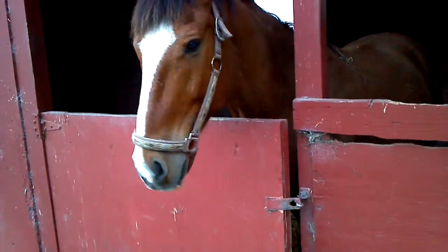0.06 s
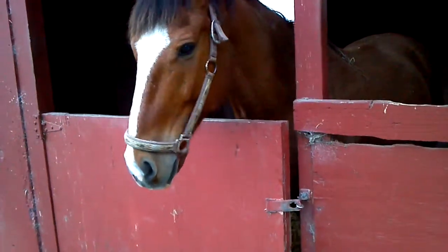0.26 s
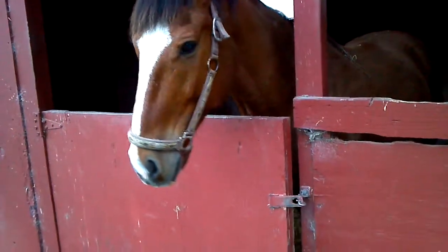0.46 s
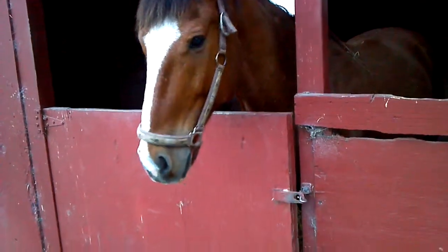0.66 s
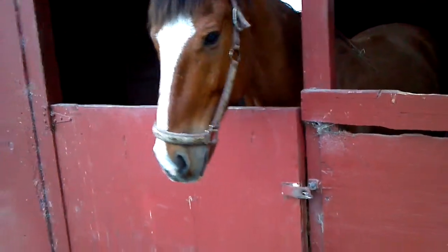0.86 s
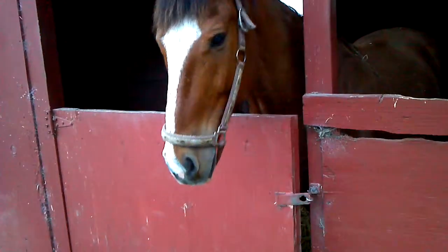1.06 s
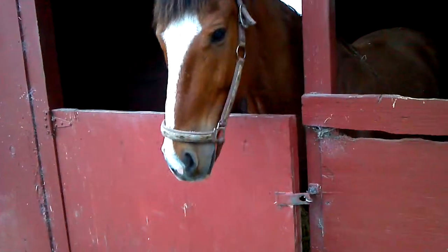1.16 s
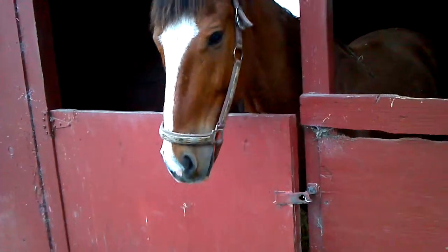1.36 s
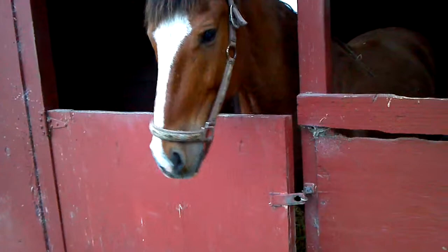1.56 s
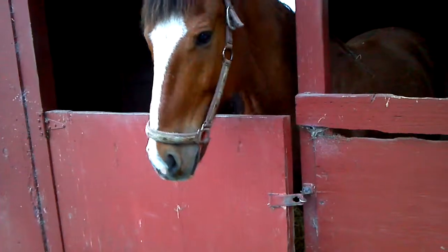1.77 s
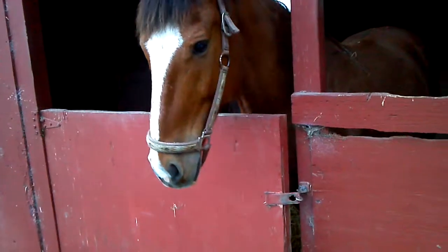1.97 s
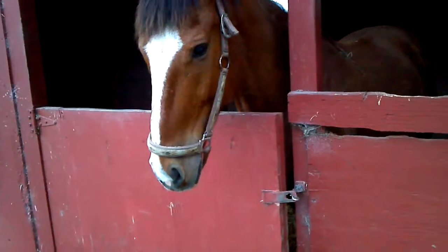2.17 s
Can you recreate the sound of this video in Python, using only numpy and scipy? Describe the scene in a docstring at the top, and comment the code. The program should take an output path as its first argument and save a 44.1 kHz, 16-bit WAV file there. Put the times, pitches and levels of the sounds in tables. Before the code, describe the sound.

A horse knocks a wooden stall door. Faint outdoor hiss opens; at 0.23 s one hard, boomy bang hits, slightly overloaded, with steel bolt rattle trailing to 0.45 s. A faint metal rub leads to a sharp clink at 1.04 s. Duller knocks come at 1.32, 1.5 and 1.62 s, with bolt clatter and sliding until 1.8 s, and a tiny tick at 2.15 s. Close microphone, short stall reverberation.

```python
"""Horse bumping a stall door

One hard bang on a wooden door, later three duller knocks: short pushes that ring the panel and the stall.
The door's steel bolt clatters and slides in its keeper: bursts of grainy noise that ring the metal.
A far-off outdoor hiss, made of coloured noise that gently rises and falls, lies underneath."""
import sys
import numpy as np
from scipy import signal
from scipy.fft import rfft, irfft
from scipy.io import wavfile

SR = 44100
rng = np.random.default_rng(int(sys.argv[2]) if len(sys.argv) > 2 else 0)


def master_out(mix):
    """Clip the mix to full scale and print it as 16-bit PCM to the path in sys.argv[1]."""
    frames = np.transpose(np.atleast_2d(mix))
    ceiling = np.clip(frames, -1, 1)
    pcm = np.round(ceiling * 32767).astype(np.int16)
    wavfile.write(sys.argv[1], SR, pcm)


N = 97020  # length in samples
T = np.arange(N) / SR  # time in seconds


def from_db(db):
    """Turn decibels into gain."""
    return 10 ** (np.asarray(db) / 20)


def at_hz(points, hz):
    """Read a table between its points, on a log-frequency axis."""
    point_hz, values = np.transpose(points)
    return np.interp(np.log(np.maximum(hz, 1)), np.log(point_hz), values)


def convolve(x, response):
    """Pass a sound through an impulse response."""
    return signal.fftconvolve(np.atleast_2d(x), np.atleast_2d(response), axes=-1)[:, :N]


def colour(x, points, share=1):
    """Filter a sound to a spectrum, with no sound ahead of its cause (minimum phase)."""
    size = 8192
    gain = from_db(share * at_hz(points, np.fft.rfftfreq(size, 1 / SR)))
    cepstrum = irfft(np.log(gain))
    # Folding the second half onto the first moves all the energy after time zero.
    cepstrum[1:size // 2] *= 2
    cepstrum[size // 2 + 1:] = 0
    response = irfft(np.exp(rfft(cepstrum)))[:size // 2]
    return convolve(x, response)


def lowpass(x, hz, order=2):
    """Keep the lows: a Butterworth low-pass."""
    sos = signal.butter(order, min(hz, .45 * SR), fs=SR, output="sos")
    return signal.sosfilt(sos, x + 1e-18)


def shelf(x, hz, db):
    """Raise or lower what lies under hz, with a gentle slope."""
    return x + (from_db(db) - 1) * lowpass(x, hz, order=1)


def bite(x, hz, db):
    """Raise or lower one narrow band."""
    b, a = signal.iirpeak(min(hz, .45 * SR), 8.9, fs=SR)  # 8.9 is the sharpness, Q
    return x + (from_db(db) - 1) * signal.lfilter(b, a, x)


def place(x, balance):
    """Tilt left against right by frequency, using a part of the balance table on each side."""
    left = colour(x[0], balance, 0.39)
    right = colour(x[1], balance, -0.26)
    return np.vstack([left, right])


def add(track, sound, s):
    """Mix a sound in at time s."""
    start = int(s * SR)
    track[:, start:start + sound.shape[-1]] += sound[..., :N - start]


def drift(per_s):
    """Random wander around 0 with straight lines between per_s random points a second."""
    knots = rng.standard_normal(N)
    return np.interp(T * per_s, np.arange(N), knots)


def stereo_noise():
    """White noise whose left-right likeness is set by mixing a shared part with an opposed part."""
    # How alike the two ears are. Each row: frequency in Hz, correlation (held within -0.99 to 0.99 below).
    likeness = [(60, -1.4), (130, -0.39), (250, 0.67), (500, 0.53), (1000, 1), (1900, 0.29), (3500, -0.22),
                (12000, -0.53)]
    alike = np.clip(at_hz(likeness, np.fft.rfftfreq(N, 1 / SR)), -.99, .99)
    mid, side = rfft(rng.standard_normal((2, N)))
    mid = mid * np.sqrt((1 + alike) / 2)
    side = side * np.sqrt((1 - alike) / 2)
    return irfft(np.array([mid + side, mid - side]), N)


def ringing(modes, favoured_hz, lift_db):
    """A struck body's ring: dying sines of alternating sign; the point of contact favours some."""
    favour_octaves = 0.06  # width of the favoured region
    t = T[:SR // 2]
    hz, db, t60 = np.transpose(modes)[:, :, None]
    distance = np.log2(hz / favoured_hz) / favour_octaves
    db = db + lift_db * np.exp(-distance ** 2)
    sign = (-1) ** np.arange(len(hz))[:, None]
    envelope = from_db(db - 60 * t / t60)
    return np.sum(sign * envelope * np.sin(2 * np.pi * hz * t), axis=0)


def stall():
    """The stall's dense reflections: noise in octave bands, each dying away at its own speed."""
    # Ring of the stall. Each row: frequency in Hz, time to fall by 60 dB in seconds.
    stall_t60 = [(100, 0.51), (250, 0.36), (600, 0.27), (1500, 0.44), (4000, 0.24), (14000, 0.28)]
    noise, out = rfft(stereo_noise()), 0
    octave = np.log2(np.clip(np.fft.rfftfreq(N, 1 / SR), 62.5, 16000) / 62.5)
    for k in range(9):
        band_share = np.maximum(1 - abs(octave - k), 0)
        band = irfft(noise * band_share, N)[:, :SR]
        out = out + band * from_db(-60 * T[:SR] / at_hz(stall_t60, 62.5 * 2 ** k))
    return out


def outdoors():
    """Distant hiss: noise that slowly rises and falls with a slight waver, under a steady airy hiss."""
    # Slow rise and fall of the far hiss. Each row: time in seconds, level in dB (only its changes count).
    hiss_level = [(0.0, -44), (0.24, -47), (0.49, -49), (0.99, -45), (1.14, -48.5), (1.38, -48.5),
                  (1.56, -39.5), (1.92, -47), (2.2, -45)]
    # Tone of the far hiss. Each row: frequency in Hz, relative level in dB.
    far_hiss = [(25, -31), (60, -43.5), (85, -37.5), (130, -34.5), (250, -32), (500, -33.5), (900, -29),
                (1300, -35.5), (1900, -40.5), (2700, -56), (4000, -57.5), (8000, -76)]
    # Tone of the airy hiss. Each row: frequency in Hz, relative level in dB.
    air_hiss = [(500, -76), (2000, -92), (3800, -56.5), (5600, -68.5), (7500, -63), (10000, -65.5),
                (14200, -66.5), (14800, -113)]
    # Left against right, used in part. Each row: frequency in Hz, tilt to the left in dB.
    hiss_balance = [(50, 6), (130, 9.5), (250, -0.5), (500, -11.5), (1000, -7), (1900, -5.5), (4000, -2.5),
                    (12000, -1)]
    hiss_db, air_db = -2.5, 0.5
    follow_share = 0.66  # how much of the slow rise and fall is used
    waver_db, waver_per_s = 1, 7.5
    level = np.interp(T, *np.transpose(hiss_level))
    level = hiss_db + follow_share * (level - level.mean()) + waver_db * drift(waver_per_s)
    far = colour(stereo_noise() * from_db(level), far_hiss)
    air = from_db(air_db) * colour(stereo_noise(), air_hiss)
    return place(far + air, hiss_balance)


def bolt_rub():
    """The bolt rubs in its guide: grainy noise that swells and fades with each slide."""
    # Slides of the bolt. Each row: start in seconds, length in seconds, relative level in dB.
    slides = [(.245, 0.22, -50), (0.586, 0.38, -62), (0.94, 0.3, -54), (1.51, 0.16, -44.5),
              (1.66, 0.2, -49)]
    # Tone of the rubbing. Each row: frequency in Hz, relative level in dB.
    rub_tone = [(100, -13), (800, -5), (2000, -0.5), (4000, -4.5), (6000, -2.5), (8000, -5), (9700, 3),
                (12000, -3), (13500, -9), (15500, -13)]
    grain_db, grains_per_s = 4.5, 270
    swell = np.zeros(N)
    for s, length, db in slides:
        progress = np.clip((T - s) / length, 0, 1)
        swell += from_db(db) * np.sqrt(np.sin(np.pi * progress).clip(0))
    grain = from_db(grain_db * drift(grains_per_s))
    return colour(swell * grain * stereo_noise(), rub_tone)


def bolt():
    """Each contact is a brief, grainy chatter of steel that rings the latch; the bolt also rubs."""
    # The bolt hits its keeper. Each row: start in seconds, relative level in dB, boost below the treble
    # in dB, clatter decay constant in seconds, favoured frequency in Hz, its lift in dB.
    clinks = [(0.231, -17, 12, 0.00091, 3820, 14.5), (0.237, -20, 8, 0.0046, 6900, 10),
              (0.2596, -25, -2, 0.0023, 4130, 3), (0.288, -39.5, 12.5, 0.0072, 7000, 8),
              (0.297, -30.5, 3.5, 0.0022, 6840, 15), (.3200, -35, -16, .004, 10200, 2),
              (0.399, -38, 6, 0.016, 11000, 11.5), (0.428, -47, 10.5, 0.0017, 3630, 20),
              (.4390, -23.5, -2, 0.0025, 14750, 11.5), (0.452, -42, 11.5, 0.0044, 14750, 12),
              (0.7875, -54.5, 10.5, 0.0056, 3530, 22.5), (0.841, -47, 3, 0.0043, 7050, 15),
              (1.0374, -18.5, 3.5, 0.012, 10100, 4), (1.044, -7, 1.5, 0.0035, 3470, 20),
              (1.1420, -30.5, 8, 0.0037, 3730, -22), (1.148, -29, 5, 0.009, 11200, 7.5),
              (1.191, -36, -2.5, 0.019, 10200, -2), (1.2212, -42, -7, 0.0021, 8880, 32),
              (1.226, -34, -12, 0.0067, 14300, 20), (1.3237, -47.5, 14, 0.0034, 3800, 0),
              (1.4415, -23.5, 1, 0.015, 3760, -12), (1.4494, -16.5, 0, 0.0059, 3610, 20.5),
              (1.4563, -21.5, 6.5, 0.0051, 14640, 2.5), (1.5023, -37.5, 12, 0.0025, 10200, -4),
              (1.6152, -34.5, 3.5, 0.0043, 10400, 8), (1.6218, -40.5, 8.5, 0.0064, 4600, 23),
              (1.643, -27.5, -4.5, 0.0025, 3200, 24), (1.647, -19.5, 5.5, 0.0052, 15000, 6),
              (1.6623, -46.5, 12, 0.0084, 4170, 12), (1.7242, -31, 5, 0.0016, 10300, -15),
              (1.748, -26.5, 1.5, 0.012, 1520, 12), (1.7655, -26.5, 2, 0.0053, 9300, 11),
              (1.777, -30.5, 10, 0.0053, 850, 22), (2.145, -28.5, -4.5, 0.012, 10700, 10)]
    # Ring of bolt and keeper. Each row: frequency in Hz, relative level in dB, time to fall 60 dB in seconds.
    bolt_modes = [(1254, -43, 0.075), (1526, -47, 0.092), (1980, -61, 0.058), (3257, -32.5, 0.01),
                  (3662, -39.5, 0.011), (3710, -37, 0.036), (3980, -65, 0.11), (5240, -64, 0.047),
                  (7610, -36, 0.013), (8900, -40, .04), (9820, -47.5, 0.089), (11800, -68, 0.036),
                  (13100, -43, .08), (14200, -48, 0.023), (14750, -43, 0.026)]
    # Tone of the chatter. Each row: frequency in Hz, relative level in dB.
    clatter = [(60, -19), (300, -1.5), (900, -1.5), (1500, 2), (2100, 3), (2600, -14.5), (3500, -0.5),
               (4200, 2), (5200, -5), (7000, -6), (10500, 1.5), (14800, -4), (15800, -19)]
    # As the bolt comes free it sings on faintly: start in seconds, relative level in dB,
    # time to fall by 60 dB in seconds.
    free_ring = (1.778, -50, .55)
    free_ring_hz = 9550
    clink_db, room_db = -2.5, -41
    weight_hz, rise_s = 5400, 0.00023
    grain_db, grains_per_s = -1, 1800
    bite_share = 0.7  # the favoured band also stands out of (or sinks into) the chatter, by this share

    rub = bolt_rub()
    chatter, ring = np.zeros((2, 2, N))
    grains = stereo_noise() * from_db(grain_db * drift(grains_per_s))
    for s, db, weight_db, decay_s, favoured_hz, lift_db in clinks:
        burst = grains[:, int(s * SR):][:, :SR // 20]
        age = T[:burst.shape[1]]
        shape = (1 - np.exp(-age / rise_s)) * np.exp(-age / decay_s)
        burst = burst * shape
        # Even out the luck of the noise, so that the shape alone sets the strength.
        burst = burst * np.sqrt(np.mean(shape ** 2) / np.mean(burst ** 2))
        burst = from_db(db + clink_db) * shelf(burst, weight_hz, weight_db)
        add(chatter, bite(burst, favoured_hz, bite_share * lift_db), s)
        add(ring, convolve(burst, ringing(bolt_modes, favoured_hz, lift_db)), s)
    s, db, t60 = free_ring
    add(ring, from_db(db - 60 * T / t60) * np.sin(2 * np.pi * free_ring_hz * T), s)
    latch = colour(chatter, clatter) + ring + rub
    room = convolve(latch.mean(axis=0), stall())
    return latch + from_db(room_db) * room


def door():
    """Each blow is a short push: a thud, the panel's modes and the boom of the stall behind."""
    # Blows on the door. Each row: start in seconds, relative level in dB, contact brightness in Hz,
    # extra bass in dB, relative stall boom in dB, favoured frequency in Hz, its lift in dB.
    knocks = [(.2313, -3.5, 2040, 3.5, -3, 359, 6), (0.2399, -14, 865, -17, -8, 610, -10),
              (.2890, -20, 1270, 1, -4, 750, 8), (0.2982, -21, 477, 6.5, 7.5, 313, 15),
              (1.3211, -15, 786, 6.5, -5.5, 233, 9.5), (1.4951, -15.5, 1200, 3.5, 2, 228, 13),
              (1.5188, -22, 710, 4.5, -9, 207, 8), (1.6142, -15.5, 930, -2.5, 5, 590, -4),
              (1.6298, -20.5, 527, 7, -1.5, 314, 16)]
    # Ring of the panel before any leaning. Each row: frequency in Hz, relative level in dB,
    # time to fall by 60 dB in seconds.
    door_modes = [(116.7, -42, 0.3), (156.8, -33, 0.28), (226, -27.5, 0.45), (239.4, -21.5, .17),
                  (326, -22, 0.18), (340, -18, 0.16), (483, -23.5, 0.18), (501, -20.5, 0.19),
                  (595, -24, 0.1), (645, -39, 0.6), (726.8, -20, 0.14), (763, -18, 0.14),
                  (970, -21.5, 0.098), (1369, -33, 0.25), (1450, -49, 0.11), (1560, -21, 0.095)]
    # Tone of the thud. Each row: frequency in Hz, relative level in dB.
    thud_tone = [(30, -6), (60, -11), (110, 37.5), (200, 31), (450, 29.5), (750, 36), (1200, 30),
                 (1900, 34), (2600, 14.5), (4000, -11), (7000, 7)]
    # Tone of the boom. Each row: frequency in Hz, relative level in dB.
    boom_tone = [(30, -36.5), (60, -22), (110, -2.5), (200, 0), (350, -1.5), (700, -2), (1200, -16),
                 (2000, -13), (3000, -18.5), (8000, 10)]
    thud_db, ring_db, base_boom_db = -4, 1.5, 2
    bass_hz, low_cut_hz = 300, 75
    swing_hz = 117  # below this the panel pushes one ear as it pulls the other
    # A gentle bump leaves the horse leaning on the panel, which damps its ring.
    lean_damping_db_per_s, hard_blow_db = 70, -8

    panel, boom = np.zeros((1, N)), np.zeros((2, N))
    for s, db, contact_hz, bass_db, boom_db, favoured_hz, lift_db in knocks:
        impulse = from_db(db) * signal.unit_impulse(SR // 20)
        push = shelf(lowpass(impulse, contact_hz, order=3), bass_hz, bass_db)
        add(panel, from_db(thud_db) * colour(push, thud_tone), s)
        is_gentle = db < hard_blow_db
        damping = from_db(-lean_damping_db_per_s * is_gentle * T[:SR // 2])
        body = damping * ringing(door_modes, favoured_hz, lift_db)
        add(panel, from_db(ring_db) * convolve(push, body), s)
        add(boom, from_db(base_boom_db + boom_db) * convolve(push, stall()), s)
    right = panel - 2 * lowpass(panel, swing_hz, order=1)  # the lows turn over
    both = np.vstack([panel, right]) + colour(boom, boom_tone)
    low_cut = signal.butter(3, low_cut_hz, "high", fs=SR, output="sos")
    return signal.sosfilt(low_cut, both + 1e-18)


def scene():
    """Door and bolt close by, over the hiss."""
    # Left against right, used in part. Each row: frequency in Hz, tilt to the left in dB.
    door_balance = [(50, 11.5), (130, 8), (250, 11.5), (500, 1), (1000, 1.5), (1900, -4), (4000, -4),
                    (12000, -3)]
    return place(door() + bolt(), door_balance) + outdoors()


def record(dry):
    """The treble reaches the right microphone slightly late; loud peaks are rounded off; the top is cut."""
    lag_s, lag_above_hz, cutoff_hz = .000363, 1900, 17100
    hz = np.fft.rfftfreq(N, 1 / SR)
    lag = lag_s / (1 + (lag_above_hz / np.maximum(hz, 1)) ** 20)
    late_right = irfft(rfft(dry[1]) * np.exp(-2j * np.pi * hz * lag), N)
    pair = np.array([dry[0], late_right])
    clipped = pair / (1 + pair ** 6) ** (1 / 6)  # the bang overloads the recorder
    top_cut = signal.cheby2(12, 60, cutoff_hz, fs=SR, output="sos")
    return signal.sosfilt(top_cut, clipped)


dry = scene()
out = record(dry)
master_out(out)
```